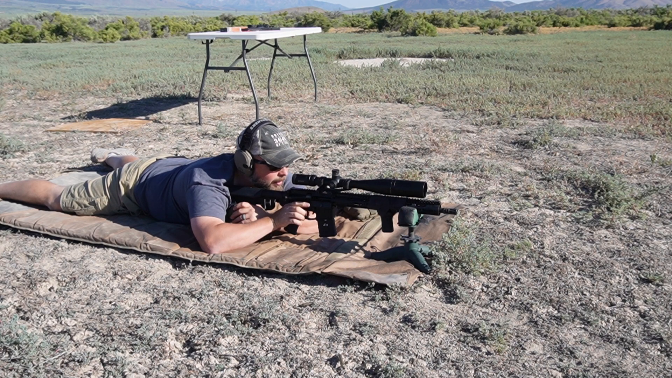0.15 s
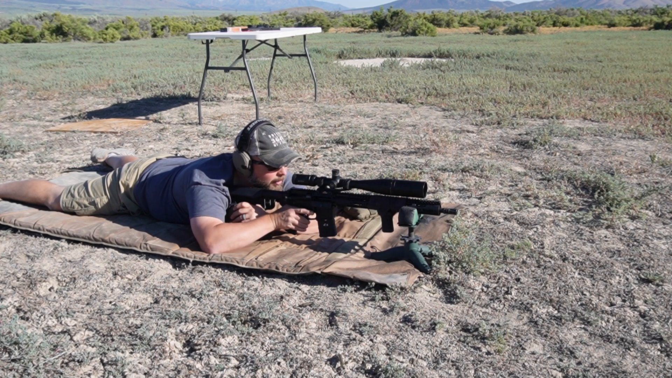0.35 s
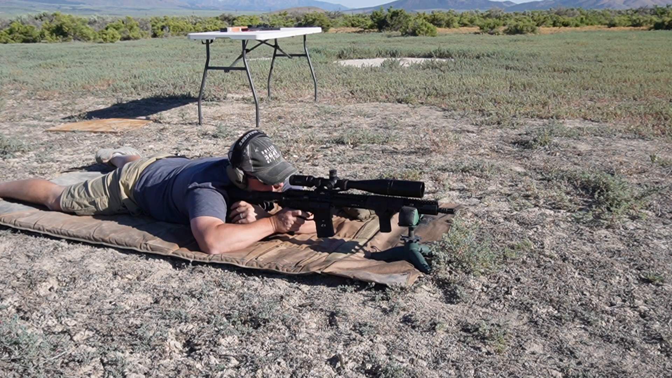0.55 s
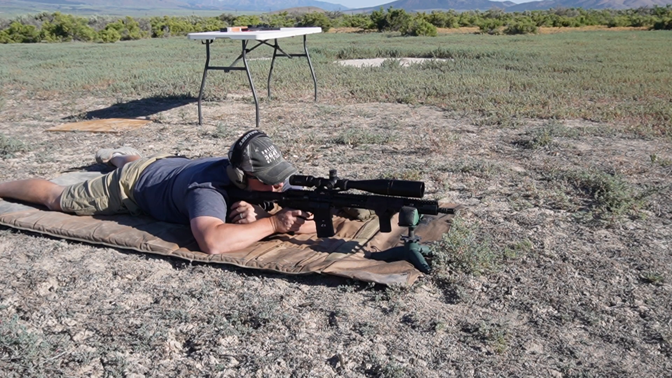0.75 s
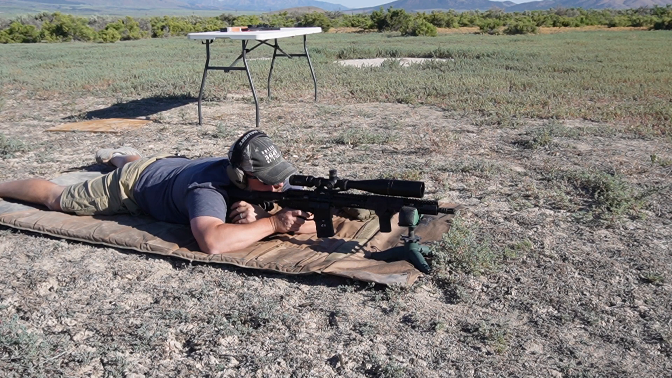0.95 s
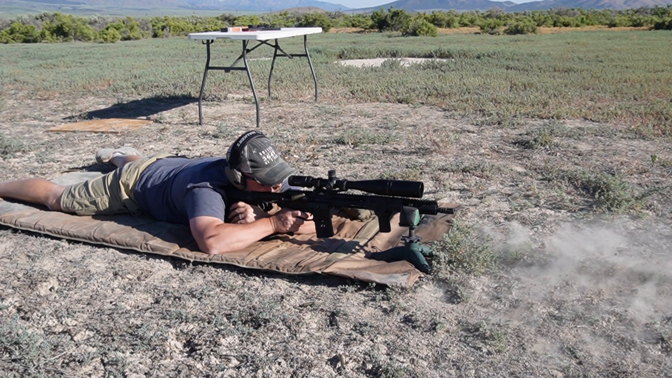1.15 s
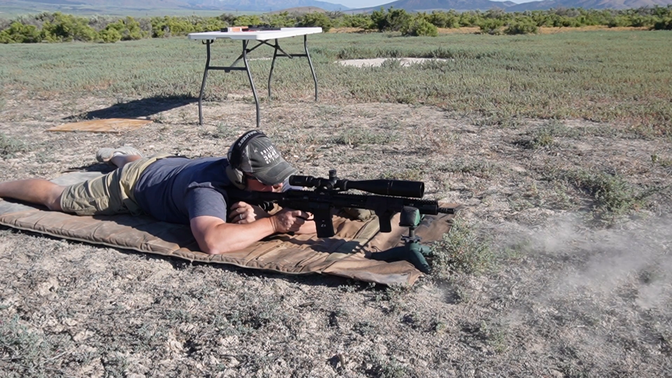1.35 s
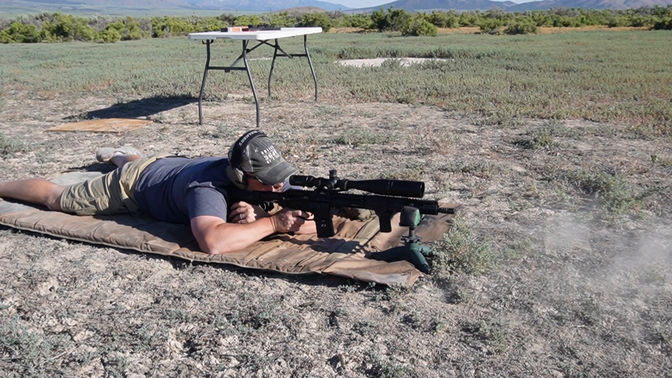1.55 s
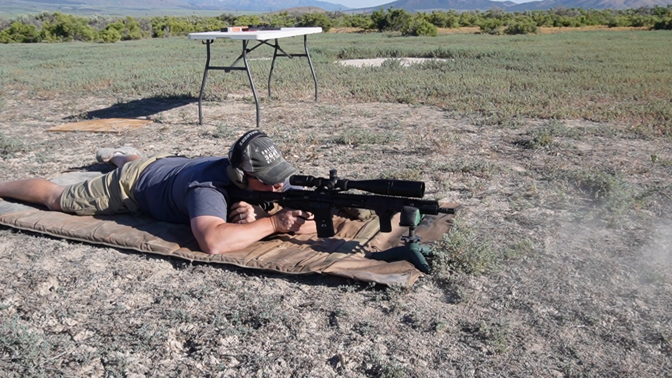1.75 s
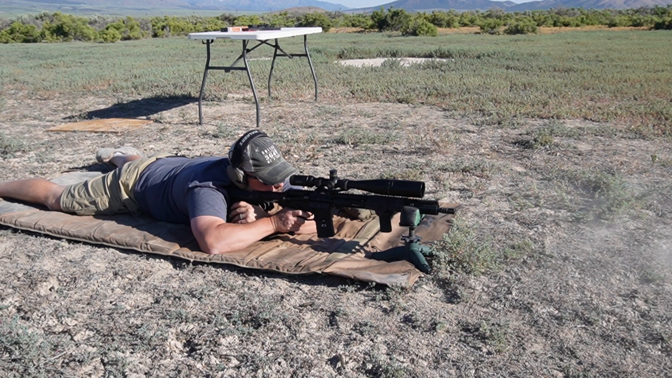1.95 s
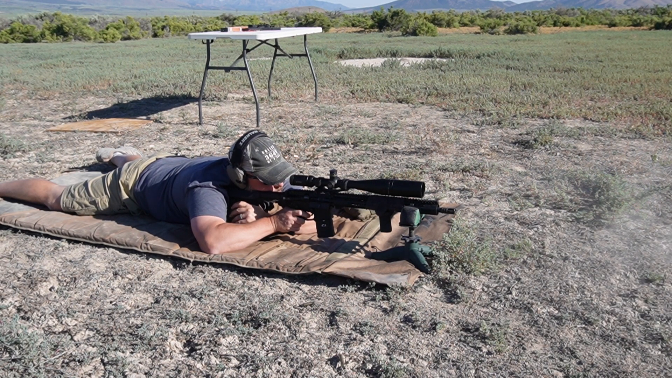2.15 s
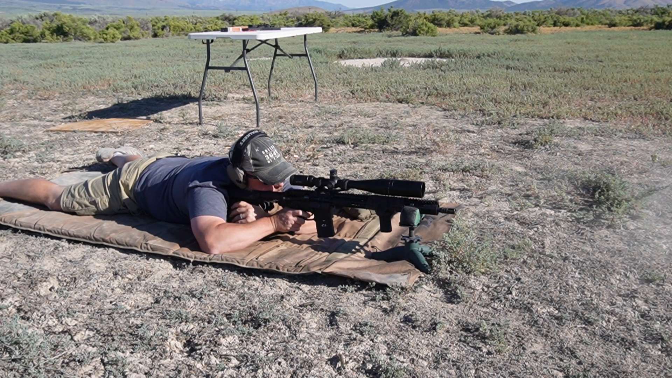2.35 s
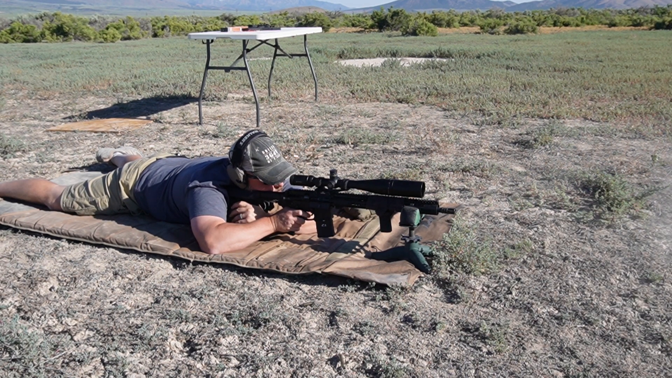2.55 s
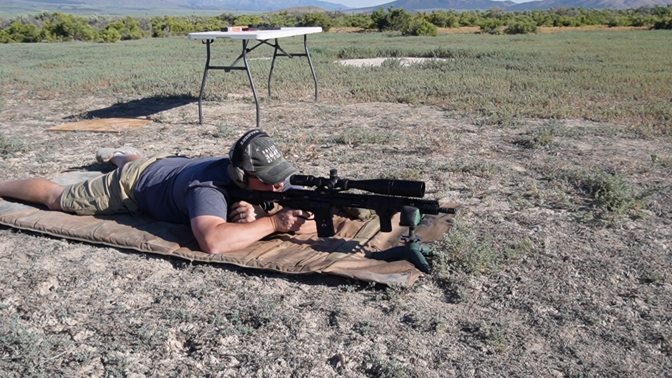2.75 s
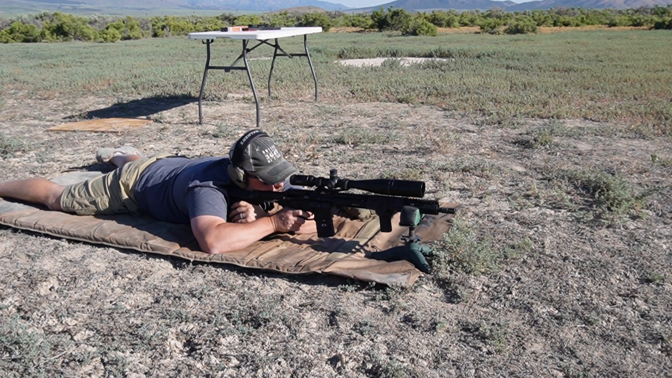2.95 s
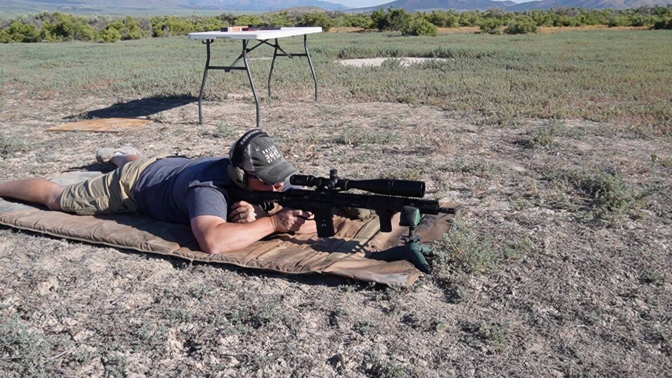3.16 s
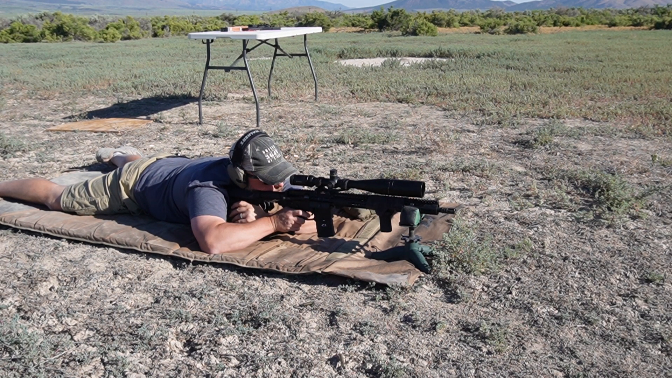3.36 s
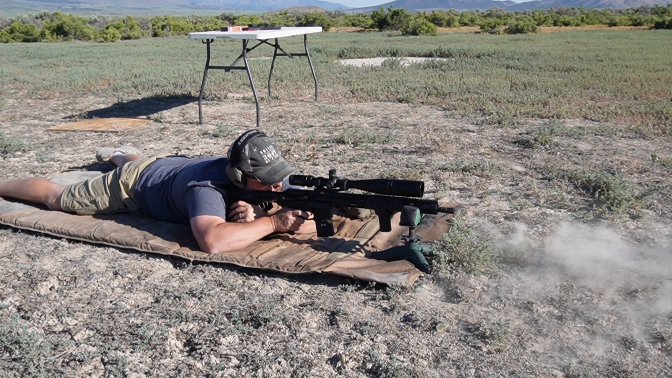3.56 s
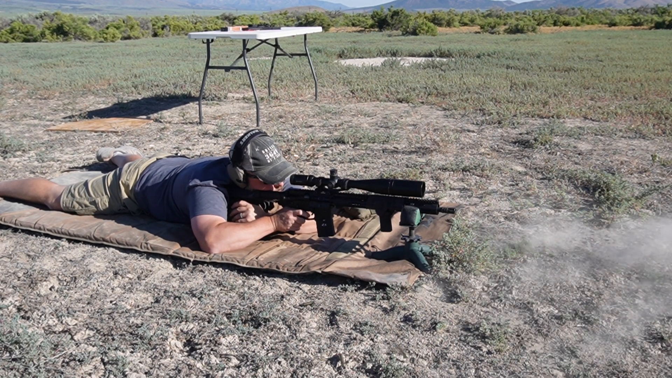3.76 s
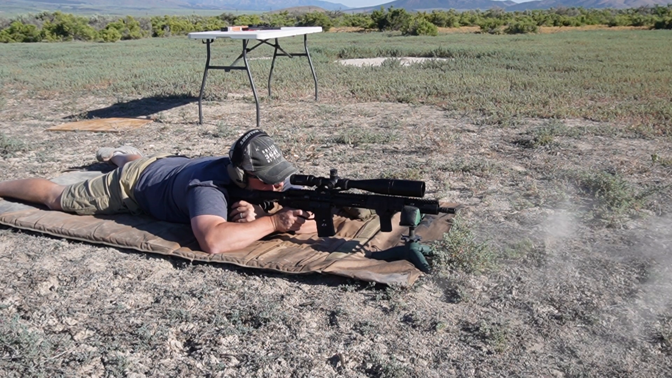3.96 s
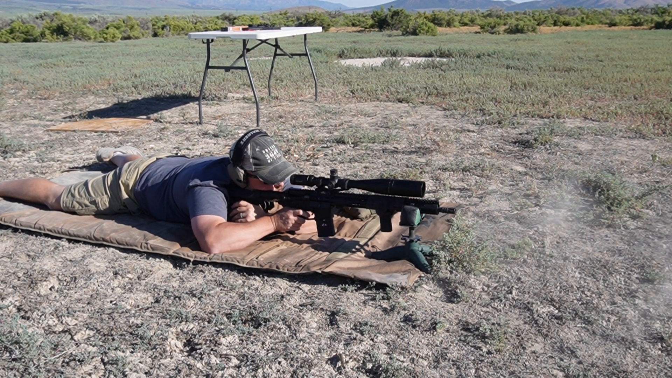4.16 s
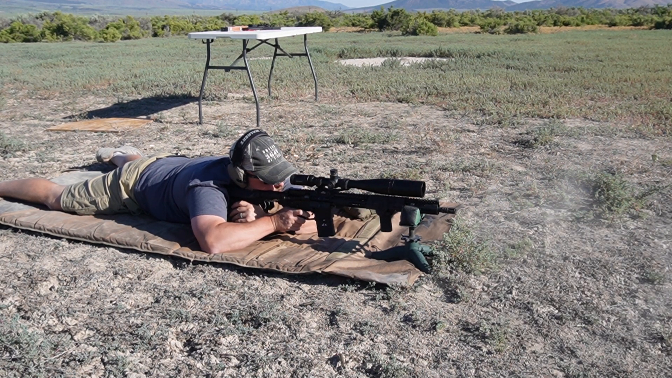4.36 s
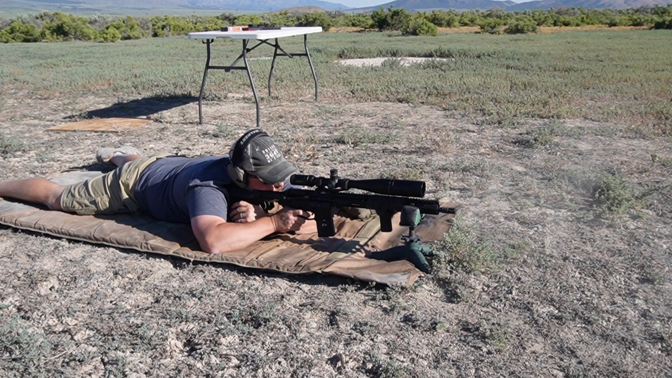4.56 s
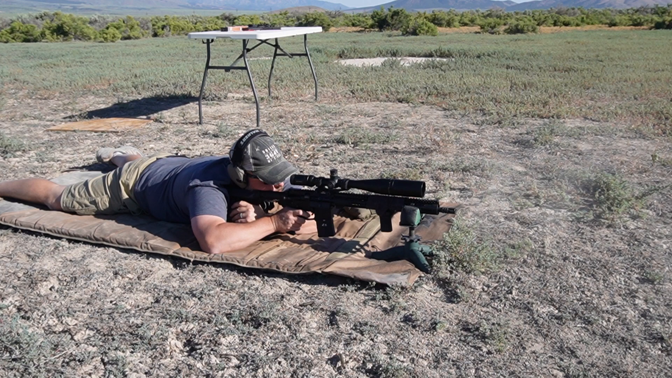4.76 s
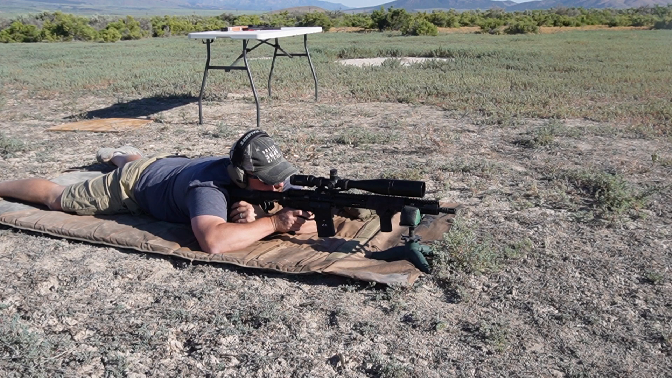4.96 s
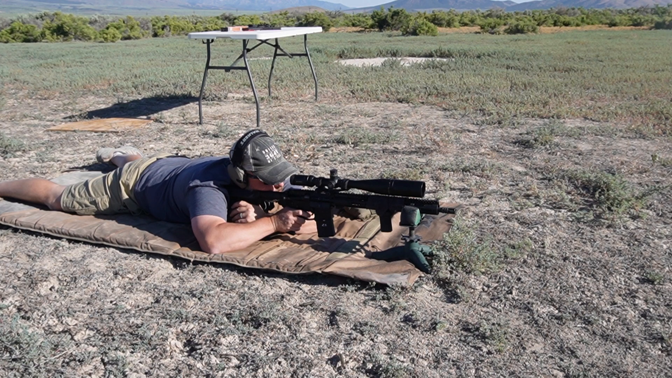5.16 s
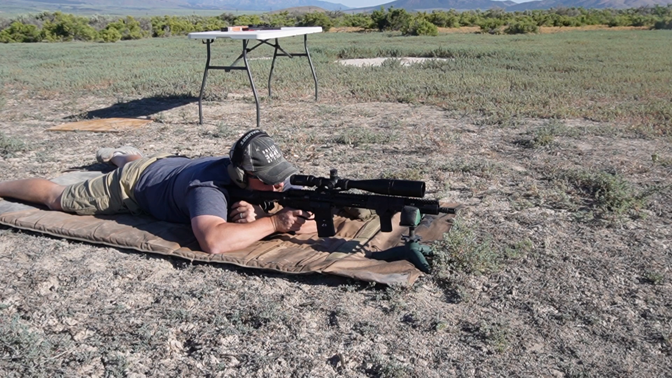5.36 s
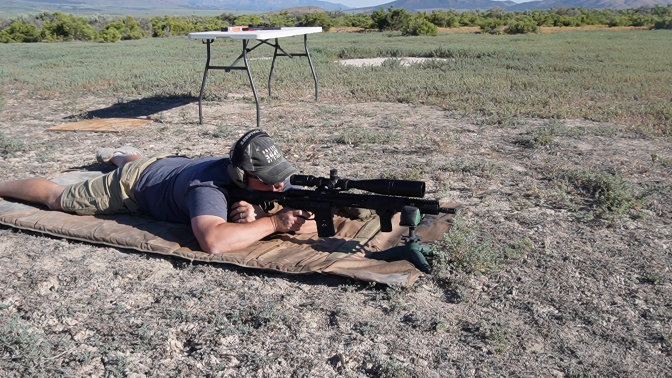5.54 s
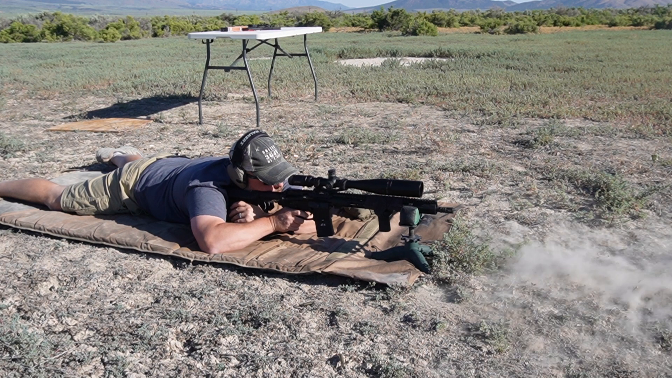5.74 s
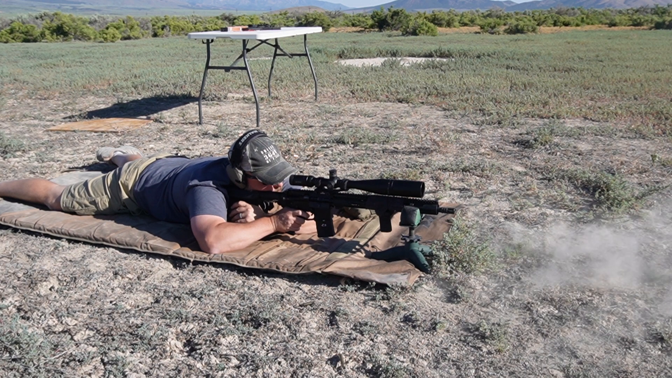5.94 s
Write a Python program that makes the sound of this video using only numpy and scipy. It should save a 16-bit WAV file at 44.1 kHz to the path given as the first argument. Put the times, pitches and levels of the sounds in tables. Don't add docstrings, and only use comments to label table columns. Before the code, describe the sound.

Outdoors, a rifle fires three slow aimed shots, each a harsh blast with clacking bolt and short hissing tail, over faint wind and drone.

```python
import sys
import numpy as np
from scipy import signal
from scipy.fft import rfft, irfft, next_fast_len
from scipy.io import wavfile
from scipy.ndimage import map_coordinates

SR = 44100
rng = np.random.default_rng(int(sys.argv[2]) if len(sys.argv) > 2 else 0)


def to_linear_factor(level_db):
    exponent = np.asarray(level_db, float) / 20
    return 10 ** exponent


def bounce(signal):
    frames = np.transpose(np.atleast_2d(signal))
    limited = np.clip(frames, -1, 1)
    pcm = np.round(limited * 32767).astype(np.int16)
    wavfile.write(sys.argv[1], SR, pcm)


N = 264544


def unit(x):
    return x / np.sqrt(np.mean(x ** 2) + 1e-20)


def along(points, hz):
    f, v = np.transpose(points)
    return np.interp(np.log(hz + 1), np.log(f + 1), v)


def curves(rows):
    s, *cols = np.transpose(rows)
    return [np.interp(np.arange(N) / SR, s, c) for c in cols]


def age_after(s):
    return np.arange(N) / SR - s


def wobble(rate_hz):
    knots = rng.standard_normal(int(N * rate_hz / SR) + 4)
    return map_coordinates(knots, [np.arange(N) * rate_hz / SR])


def filtered(x, response):
    m = next_fast_len(len(x) + 8192)
    return irfft(rfft(x, m) * response(np.fft.rfftfreq(m, 1 / SR)), m)[:len(x)]


def noise(spectrum):
    return unit(filtered(rng.standard_normal(N), lambda hz: to_linear_factor(along(spectrum, hz))))


def ring(t, hz, db, t60, phase=0):
    t = np.maximum(t, 0)
    return to_linear_factor(db - 60 * t / t60) * np.sin(2 * np.pi * hz * t + phase) * (t > 0)


def burst(t, db, rise_s, t60, lo_hz, hi_hz):
    band = signal.butter(2, [lo_hz, min(hi_hz, SR / 2.1)], "bandpass", fs=SR, output="sos")
    shape = np.where(t < 0, np.exp(-(t / rise_s) ** 2), to_linear_factor(-60 * np.maximum(t, 0) / t60))
    return to_linear_factor(db) * shape * unit(signal.sosfilt(band, rng.standard_normal(len(t))))


def add(track, s, sound):
    part = track[round(s * SR):][:len(sound)]
    part += sound[:len(part)]


def thin(x, cut_hz):
    return signal.sosfilt(signal.butter(3, cut_hz, "highpass", fs=SR, output="sos"), x)


# f/Hz, density/dB per Hz
QUIET_SPECTRUM = [(8.8, -32.5), (15, -2.5), (113, -1.5), (155, -11), (332, -22), (363, -6.5), (579, -7),
                  (799, -16), (1270, -16), (2100, -19.5), (2290, -18), (12800, -20.5), (16200, -22.5)]
# f/Hz, level/dB rms
BUZZ_TONES = [(500.6, -77.5), (748.3, -76.5), (1001, -76.5), (1249, -77.5), (1502, -77.5), (1750, -78),
              (2003, -82), (2250, -82), (2498, -87), (2751, -87.5), (4247, -91), (4500, -87), (5001, -93),
              (5502, -89)]


def camera():
    quiet_db = -59
    buzz = sum(to_linear_factor(db + 2.5) * np.sin(2 * np.pi * hz * np.arange(N) / SR) for hz, db in BUZZ_TONES)
    return buzz + to_linear_factor(quiet_db - 3) * noise(QUIET_SPECTRUM)


# t/s, f/Hz, level/dB, second order over first/dB
DRONE_TRACK = [(.45, 180.1, -82, -12), (.63, 180.2, -62.5, -4), (1.1, 177, -65, 0.5),
               (2.04, 181.4, -66.5, -9), (2.7, 183.1, -64, 0.5), (3, 186.7, -60, 1),
               (3.5, 185, -65.5, -3.5), (4, 186.9, -77, 8), (4.33, 187.4, -84.5, 32),
               (4.6, 184.5, -84, 17.5), (6, 182.4, -81, 8)]


def drone():
    hz, db, over_db = curves(DRONE_TRACK)
    turn = 2 * np.pi * np.cumsum(hz + 1.3 * wobble(8.7)) / SR
    first = to_linear_factor(db + 2.5 + 0.62 * wobble(11)) * np.sin(turn)
    second = to_linear_factor(db + over_db - 0.5 + 2.5 * wobble(8.5)) * np.sin(2 * turn)
    return first + second


# t/s, level/dB
WIND_LEVEL = [(0, -67.5), (.33, -59), (.66, -67), (1.15, -64.5), (2.07, -62.5), (2.42, -56), (2.96, -64),
              (3.32, -67.5), (3.54, -65), (4.3, -58.5), (4.56, -66), (4.86, -59), (4.98, -66), (5.27, -64),
              (5.57, -69), (6, -68)]
# f/Hz, density/dB per Hz
GUST_SPECTRUM = [(59, -45.5), (100, -9.5), (145, -16.5), (174, 2), (210, -2), (312, 2), (845, -10),
                 (947, -20), (3000, -25.5), (3900, -54.5), (6600, -120)]


def wind():
    return to_linear_factor(curves(WIND_LEVEL)[0] + 2.6 * wobble(30) + 1.2 * wobble(7)) * noise(GUST_SPECTRUM)


# end t/s, peak level/dB, swell/dB per s
RUSTLE_DRAGS = [
    (.112, -69, 170),
    (.49, -66, 16),
    (0.514, -52.5, 400),
]


def cloth():
    stop_db_per_s = 1500
    drags = 0
    for s, db, swell in RUSTLE_DRAGS:
        age = age_after(s)
        drags = drags + to_linear_factor(db + np.minimum(swell * age, -stop_db_per_s * age))
    weave = noise([(500, -26), (800, 6), (1300, -12.0), (1800, 2), (2500, -10), (5500, -1.5),
                   (9000, -15.0), (14000, -14)])
    return drags * to_linear_factor(1.9 * wobble(70)) * weave


# f/Hz, density/dB per Hz
FAR_SPECTRUM = [(2000, -30), (2900, -4.5), (4000, -3.5), (5000, -1), (6000, -7.5), (8000, -13),
                (11000, -29.5)]
# level as it emerges/dB, fade/dB per s
FAR_FADES = [
    (-58, 17),
    (-63, 36),
    (-49.5, 22),
]


def far_scrub():
    emerge_s, murmur_under_wind_db = 0.2, 12.5
    murmur = noise([(700, -30), (1000, -4.5), (1400, -6.0), (1850, -1.5), (2300, -12), (3000, -28.5)])
    fades = []
    for db, fade in FAR_FADES:
        fades.append(sum(to_linear_factor(db - fade * (age_after(s) - emerge_s)) * (age_after(s) > 0) for s, _ in SHOTS_FIRED))
    wash_level, murmur_level, rumble_level = fades
    stirred = murmur_level + to_linear_factor(curves(WIND_LEVEL)[0] - murmur_under_wind_db)
    return (wash_level * to_linear_factor(1.1 * wobble(26)) * noise(FAR_SPECTRUM)
            + stirred * to_linear_factor(1.5 * wobble(30)) * murmur
            + rumble_level * to_linear_factor(2.2 * wobble(30)) * noise(GUST_SPECTRUM))


# t/s, peak level/dB, f/Hz, knock level/dB
TICK_EVENTS = [(0.0384, -53, 2530, -9), (0.107, -49.5, 3600, -17), (0.286, -52, 4010, -2),
               (0.3331, -46, 4600, -10), (0.3654, -46, 7500, -0.5), (0.4444, -55, 3660, 4.5),
               (0.4576, -44, 4000, -13), (0.503, -42, 5950, -23), (0.5104, -37.5, 5620, -26),
               (1.5474, -42, 3620, -3), (1.6948, -42, 5210, -21), (1.7021, -41, 4590, -14),
               (1.7944, -42, 5330, -9), (2.1176, -35.5, 4700, -12), (2.6544, -47.5, 4650, -15),
               (3.9409, -40, 4930, -18), (4.1374, -47, 3590, -21), (4.1964, -47, 5200, 7.5),
               (4.241, -48.5, 4230, -3), (4.3484, -52.5, 2660, -8), (4.7666, -46, 3323, -13),
               (4.899, -49.5, 4415, -4), (4.396, -63, 2000, 6.5)]
# lead before the blast/s, peak level/dB, f/Hz, knock level/dB
TRIGGER_TICK = (.0545, -47.5, 2400, -1)


def ticks():
    out, lead_s, cycles_to_60_db = np.zeros(N), .004, 53
    t = np.arange(4000) / SR - lead_s
    before_s, *trigger = TRIGGER_TICK
    for s, db, hz, knock_db in list(TICK_EVENTS) + [(s - before_s, *trigger) for s, _ in SHOTS_FIRED]:
        t60 = cycles_to_60_db / hz
        grit = burst(t, db - 5.5, 0.00041, t60, hz / 1.4, hz * 1.45)
        knock = burst(t, db + knock_db + 1.5, 0.00023, 1.03 * t60, 520, 1820)
        add(out, s - lead_s + 0.0006, grit + knock)
    return thin(out, cut_hz=420)


# t/s, peak level/dB
STAND_KNOCKS = [(1.955, -3)]
# f/Hz, level/dB, t60/s
STAND_MODES = [(400, -24, .03), (523, -50, 0.6), (585, -18, 0.05), (830, -53, 0.6), (812, -16, 0.034),
               (1355, -8, .016), (1845, -14, .035), (1900, -46, 0.2), (2800, -9, .008), (3050, -6, 0.007),
               (3560, -35, .1), (4500, -19, .025), (5300, -34, .06)]


def stand_knock():
    out, lead_s = np.zeros(N), .004
    t = np.arange(SR // 2) / SR - lead_s
    for s, db in STAND_KNOCKS:
        body = 0
        for hz, level_db, t60 in STAND_MODES:
            rattle_db = 5 * wobble(70)[:len(t)] * (t > .01)
            body = body + ring(t, hz, db + level_db + rattle_db, t60)
        dull = burst(t - .0008, db - 5, 0.00025, 0.012, 440, 4200)
        bright = burst(t - .0004, db - 17, 0.00025, 0.012, 6500, 14000)
        add(out, s - lead_s, body + dull + bright)
    return thin(out, cut_hz=420)


# t/s, click level/dB, low ring level/dB, high ring level/dB, partner level/dB
CASE_BOUNCES = [
    (1.566, -24.5, -40.5, -43.5, 0),
    (1.7405, -40, -50, -58, -6),
    (1.757, -37.5, -44.5, -55.5, -8),
]
# (f/Hz, t60/s) of partner, (f/Hz, t60/s) of main, partner lead/rad
BRASS_PAIRS = [
    ((10939, 0.22), (10987, 0.22), 2.5),
    ((12989, 0.55), (13015, 0.55), 1.1),
]
# t/s, f/Hz, level/dB, t60/s
LEG_TONE = (1.57, 721, -61, 2.8)


def brass_case():
    out, lead_s, rests_s = np.zeros(N), .004, 1.93
    t = np.arange(SR // 2) / SR - lead_s
    next_times = [row[0] for row in CASE_BOUNCES[1:]] + [rests_s]
    for (s, click_db, *levels, partner_db), next_s in zip(CASE_BOUNCES, next_times):
        tone = 0
        for db, ((partner_hz, partner_t60), (hz, t60), turn) in zip(levels, BRASS_PAIRS):
            tone = tone + ring(t, partner_hz, db + partner_db, partner_t60, turn) + ring(t, hz, db, t60)
        tone = tone * (t < next_s - s) * to_linear_factor(2.5 * wobble(60)[:len(t)])
        stone = ring(t, 1680, click_db - 5.0, 0.0074) + ring(t, 3480, click_db - 8.5, 0.0093)
        top_mode = ring(t, 14800, levels[0] - 19, .2)
        click = burst(t, click_db - 7.5, 0.00042, 0.013, 700, 15000)
        add(out, s - lead_s, tone + stone + top_mode + click)
    leg_s, *leg = LEG_TONE
    add(out, leg_s - lead_s, ring(t, *leg) * (t < .385))
    return thin(out, cut_hz=420)


def echo_db(age, hold_s, last_bush_s, first_db, crest_db, crest_s, sag, fall):
    first_s, swell_bend = .008, 1.1
    rise = np.clip((age - first_s) / (crest_s - first_s), 0, 1) ** swell_bend
    level = first_db + (crest_db - first_db) * rise
    level = level - sag * np.maximum(age - hold_s - crest_s, 0) - fall * np.maximum(age - last_bush_s, 0)
    return np.where(age > first_s, level, -120)


# f/Hz, density/dB per Hz
BRUSH_SPECTRUM = [(47, -62), (80, -33.5), (167, -13), (297, -11.5), (332, -6), (738, -10.5), (1920, -12.5),
                  (2680, -19.5), (3820, -4), (5700, -8), (7120, 2.5), (7960, -8), (10400, -13.5),
                  (14500, -21.5), (16200, -36.5)]
# f/Hz, width/Hz, level/dB
SHELL_MODES = [(425, 95, 7.5), (1920, 460, 6), (3720, 530, 5), (4520, 200, 6), (7040, 20, 5.5),
               (7992, 270, 5), (10400, 710, 5.5)]
# first return/dB, crest/dB, crest t after blast/s, sag/dB per s, fall past last bush/dB per s
ECHO_BANDS = [
    (-32, -24, 0.13, 120.5, 429),
    (-31.5, -17, .118, 137, 365),
    (-27, -20.5, 0.11, 63.5, 398),
    (-25.5, -22.5, 0.05, 62, 254),
    (-21, -23, .05, 88, 101),
]
# hold/s, last bush t after blast/s, darkening/dB per band
BRUSH_REACH = [
    (0.002, 0.23, 0.86),
    (.03, 0.26, 0.82),
    (0.015, .24, 0.5),
]


def brush_echo():
    lumps_db = 1
    spike_db = 1.6 * rng.exponential(1, N) + 1.6 * wobble(300) + 1.2 * wobble(110)
    spikes = rng.standard_normal(N) * to_linear_factor(spike_db)

    def shell(hz):
        peaks_db = sum(db / (1 + (2 * (hz - c) / width) ** 2) for c, width, db in SHELL_MODES)
        return to_linear_factor(along(BRUSH_SPECTRUM, hz) + peaks_db)

    def under(hz, at_hz):
        return 1 / (1 + (hz / at_hz) ** 12)

    edges_hz = [SR, 9000, 6000, 3000, 1200, 1]
    layers = []
    for hi, lo in zip(edges_hz, edges_hz[1:]):
        band = filtered(spikes, lambda hz: shell(hz) * (under(hz, hi) - under(hz, lo)))
        layers.append(unit(band) * to_linear_factor(lumps_db * wobble(70)))
    out = np.zeros(N)
    for (s, _), (hold_s, last_bush_s, darker_db) in zip(SHOTS_FIRED, BRUSH_REACH):
        for k, (rule, layer) in enumerate(zip(ECHO_BANDS, layers), -2):
            out += to_linear_factor(echo_db(age_after(s), hold_s, last_bush_s, *rule) + k * darker_db) * layer
    return out


# delay/ms, f/Hz, level over overload/dB, t60/ms
GAS_SURGES = [
    (0, 5900, 25, 5),
    (1, 1050, 22, 11),
    (2.6, 3800, 11, 12),
    (3.6, 1820, 17.5, 14),
    (7.4, 620, 11, 22),
    (9, 345, -2, 150),
    (10.3, 1250, 7, 12),
    (12.4, 850, 7, 14),
    (15, 455, 0, 110),
]


def blast(t):
    gas = burst(t - .0018, 16, .0005, .018, 1000, 12000)
    for ms, hz, db, t60_ms in GAS_SURGES:
        gas = gas + ring(t - ms / 1000, hz * rng.normal(1, 0.052), db, t60_ms / 1000)
    duck = to_linear_factor(1.6 - 7.5 * (1 - np.exp(-np.maximum(t, 0) / .007)))
    coupling = signal.butter(1, [300, 12000], "bandpass", fs=SR, output="sos")
    return signal.sosfilt(coupling, np.tanh(gas) * duck)


def slap(t, hz, db, length_s):
    return to_linear_factor(db) * np.exp(-(t / length_s) ** 2) * np.sin(2 * np.pi * hz * t)


# t/s, blast level/dB
SHOTS_FIRED = [
    (1.1676, -1.5),
    (3.5587, -1.5),
    (5.8373, -1.5),
]
# delay/ms, f/Hz signed by swing, level/dB, length/ms
GROUND_SLAPS = [
    (26, 520, -8, 1.1),
    (32.4, 600, -12, 1),
    (36.6, -600, -13, .9),
    (43, 520, -6, 1.2),
    (47, 1500, -12, 2.4),
    (50.7, -480, -1.5, 1.5),
]
BOLT_SLAMS_S = [.0594, .0575, .0575]
# t after slam/s, level/dB
BOLT_HITS = [
    (0, -8.5),
    (.011, -16),
    (.05, -17),
]


def rifle():
    out, lead_s = np.zeros(N), .01
    t = np.arange(SR // 8) / SR - lead_s
    for (s, db), slam_s in zip(SHOTS_FIRED, BOLT_SLAMS_S):
        hammer = burst(t + .0037, -8.5, .001, .011, 2800, 5000)
        hammer += burst(t + .004, -11, .0006, .007, 600, 14000)
        hammer += burst(t + .0037, -16, .001, .01, 400, 2600)
        slaps = 0
        for ms, hz, level_db, length_ms in GROUND_SLAPS:
            slaps = slaps + slap(t - ms / 1000, hz, level_db + rng.normal(0, 1), length_ms / 1000)
        add(out, s - lead_s, to_linear_factor(db) * (hammer + slaps + thin(blast(t), cut_hz=180)))
        for later_s, hit_db in BOLT_HITS:
            steel = burst(t, hit_db, .0024, .014, 3400, 8000)
            steel += burst(t, 1.3 * hit_db - 6, .0024, .012, 8000, 15000)
            add(out, s + slam_s + later_s - lead_s, steel)
    return out


def scene():
    background = camera() + drone() + wind() + cloth() + far_scrub()
    small_things = ticks() + stand_knock() + brass_case()
    return (background + small_things + brush_echo() + rifle())[None]


def low_pass(x):
    return signal.sosfilt(signal.butter(12, 16360, fs=SR, output="sos"), x)


def record(dry):
    top_hz = 15760
    x = dry[0] / (1 + np.abs(dry[0] / .9) ** 6) ** (1 / 6)
    x = filtered(x, lambda hz: 1 / (1 + (hz / top_hz) ** 240))
    return low_pass(x[None])


dry = scene()
out = record(dry)
bounce(out)
```